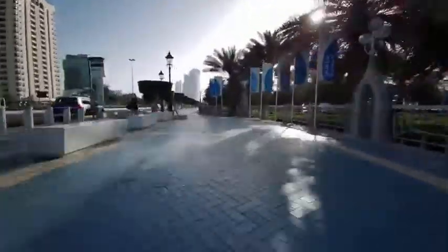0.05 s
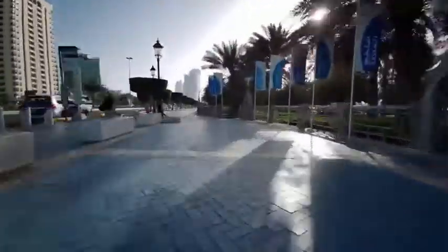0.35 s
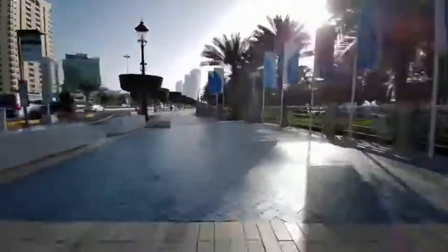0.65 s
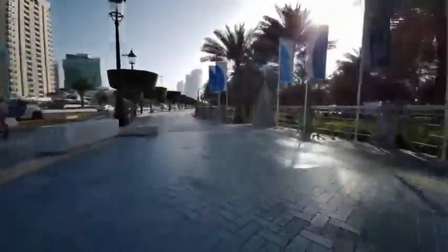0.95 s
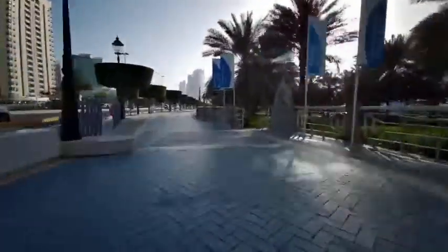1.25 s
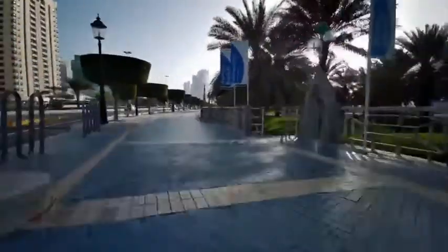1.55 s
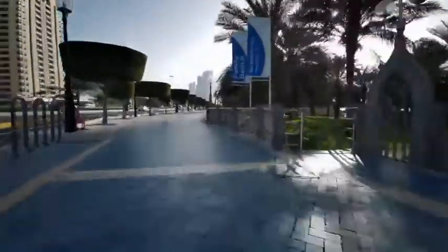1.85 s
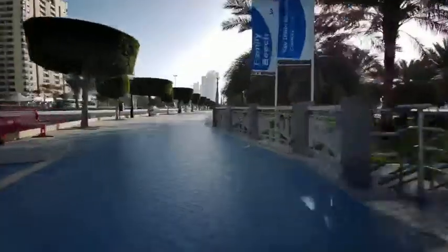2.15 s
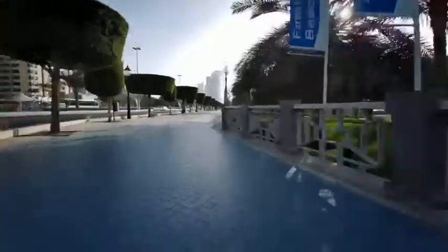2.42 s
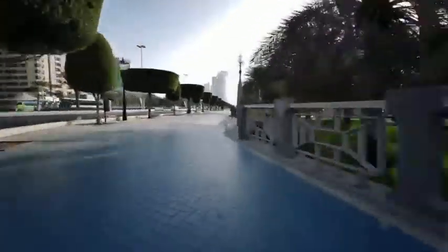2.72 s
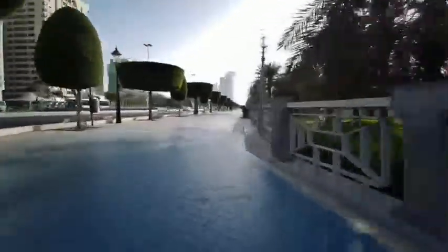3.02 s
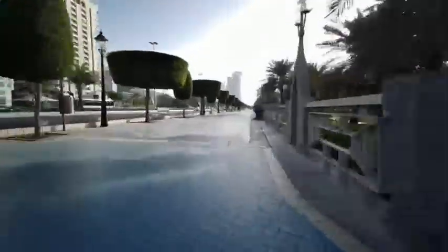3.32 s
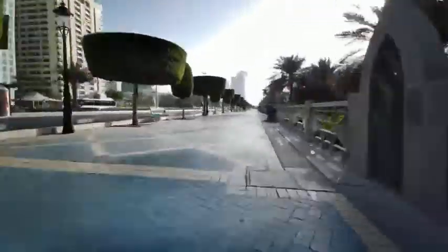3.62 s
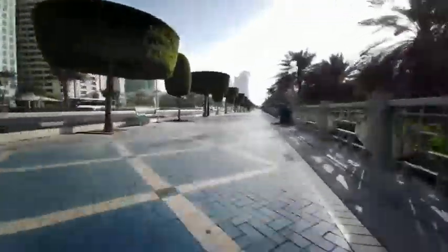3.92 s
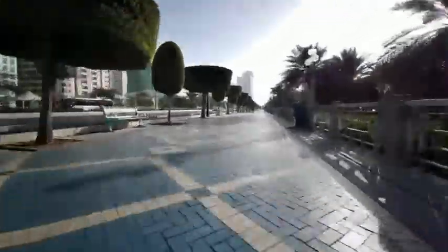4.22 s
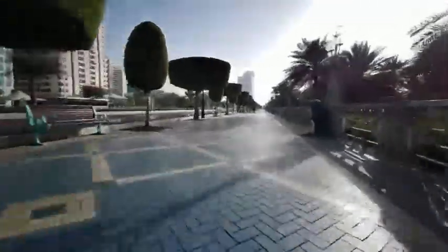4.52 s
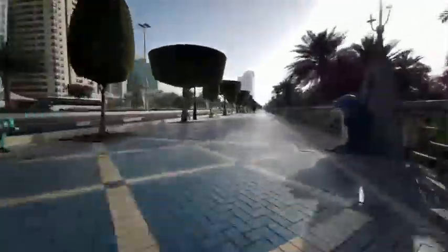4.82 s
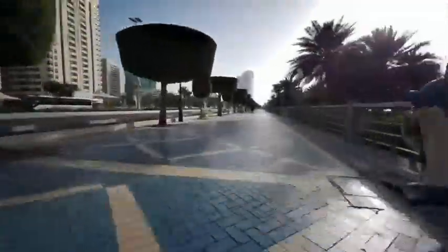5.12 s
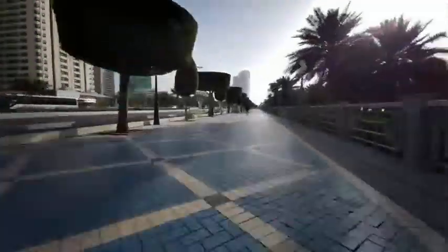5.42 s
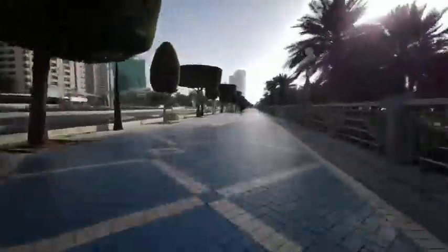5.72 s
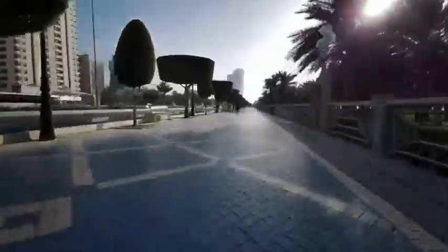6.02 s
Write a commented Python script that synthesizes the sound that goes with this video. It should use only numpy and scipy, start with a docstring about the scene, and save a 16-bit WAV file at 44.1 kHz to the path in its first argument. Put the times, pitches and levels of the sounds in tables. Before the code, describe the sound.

An electric mini bike rides over brick paving for about six seconds, heard up close from the rider. Throughout, the tyres make a hollow, drumming roar and the motor holds a slightly throbbing, mid-pitched whine that barely rises. Wind flaps and rumbles on the microphone, gusting near 0.3, 0.7, 1.6, 2.1 and 4.3 seconds, and is weaker towards the end. Loose parts clack right at the start, followed by a run of thuds from raised bricks until 0.4 seconds. More thuds and rattles come near 0.7, from 1.5 to 2.6, around 3, at 4.1, around 4.7 and from 5.3 to 5.9 seconds. Grit ticks lightly on metal here and there. From about 3 seconds a rubbing brake adds a faint, high, pulsing note, clearest near 3.4 and 5.3 seconds. The bike keeps its pace to the end.

```python
"""Electric mini bike on brick paving

A steady ride, heard up close from a stereo microphone in a case on the rider. The tyres drum on the
joints and ring the frame, the motor whines, and wind buffets the case. Bumps thud, loose parts clack,
grit ticks, and a lightly rubbing brake sings in the second half."""
import sys
import numpy as np
from scipy import signal
from scipy.fft import rfft, irfft
from scipy.io import wavfile

SR = 44100
rng = np.random.default_rng(int(sys.argv[2]) if len(sys.argv) > 2 else 0)


def dump_mix(stems):
    """Bounce the given channels to the path in sys.argv[1] as a 16-bit WAV at rate SR."""
    frames = np.atleast_2d(stems).T  # one column per channel
    limited = np.clip(frames, -1, 1)  # hard clip at full scale
    pcm = np.round(limited * 32767).astype(np.int16)
    wavfile.write(sys.argv[1], SR, pcm)


N = 271656
T = np.arange(N) / SR
HZ = np.fft.rfftfreq(N, 1 / SR)

# The motor's pace. Each row: time in seconds, pitch in Hz.
MOTOR_PITCH = [(0, 271.3), (.65, 271.5), (.9, 273.7), (1.4, 274.5), (1.7, 275), (2.2, 271), (2.55, 276.5),
               (3.3, 277), (3.7, 277.6), (4.1, 278.3), (4.5, 281.4), (5.5, 281.2), (6.16, 279.5)]
# Smoother and rougher paving. Each row: time in seconds, relative roar in dB, treble lift in dB.
PAVING_ROUGHNESS = [(0, -25, -1), (.5, -24.5, -3.5), (.85, -27.5, -.5), (1.25, -26.5, -2.5),
                    (1.52, -23.5, -2.5), (2.3, -25, -2.5), (2.75, -24.5, -1.5), (2.9, -23.5, -2.5),
                    (3.04, -22.5, -1), (3.3, -25.5, 0.5), (3.9, -25.5, 0.3), (4.3, -27.5, 0),
                    (5.15, -27, -0.5), (5.33, -26.5, 0.5), (5.46, -23.5, -0.5), (5.6, -24.5, 1),
                    (5.75, -26, 0), (6.16, -26.5, 0.5)]
# Roar and wind at the microphone. Each row: frequency in Hz, left-right likeness.
CASE_LIKENESS = [(25, 0.93), (60, 0.99), (150, 0.97), (330, 0.96), (550, 1), (1000, 0.97), (1550, 1),
                 (2600, 0.19)]


def gain_of(db):
    """Decibels to a factor."""
    return 10 ** (np.asarray(db) / 20)


def evened(x):
    """Scales to rms 1."""
    return x / np.sqrt(np.mean(x ** 2) + 1e-20)


def blip(x):
    """Scales a short stereo sound to the energy of one millisecond at rms 1."""
    return x / np.sqrt((x ** 2).mean(0).sum() * 1000 / SR)


def spectrum(points):
    """A spectrum table on the frequency grid."""
    hz, value = np.transpose(points)
    return np.interp(np.log(HZ + 1), np.log(hz + 1), value)


def follow(rows):
    """The columns of a curve table, sample by sample."""
    s, *columns = np.transpose(rows)
    return [np.interp(T, s, column) for column in columns]


def add(mix, s, sound):
    """Lays a stereo sound into the mix at time s."""
    part = mix[:, max(round(s * SR), 0):][:, :sound.shape[1]]
    part += sound[:, :part.shape[1]]


def swell(s, half_s):
    """A smooth rise from 0 to 1 and back, centred on time s."""
    return np.exp(-((T - s) / half_s) ** 2)


def wander(rate_hz):
    """A slow random drift of rms 1, up to about the given rate."""
    return evened(irfft(rfft(rng.standard_normal(N)) / (1 + (HZ / rate_hz) ** 4), N))


def sway(radians):
    """The swaying case shifts the phase between the left and right of the microphone."""
    return radians * wander(20) * np.array([[1], [-1]])


def stereo_noise(colour, likeness, drive=None):
    """Colours two unrelated drives, white noise unless given, into a left and right of that likeness."""
    if drive is None:
        drive = rng.standard_normal((2, N))
    mid, side = rfft(drive) * colour
    mid, side = mid * np.sqrt(1 + likeness), side * np.sqrt(1 - likeness)
    return evened(irfft(np.array([mid + side, mid - side]), N))


def causal(gain):
    """Gives a gain curve the phase of a body that rings after each blow, never before it."""
    log_gain = np.log(np.r_[gain, gain[-2:0:-1]])
    return np.exp(np.conj(signal.hilbert(log_gain)))[:len(gain)]


def peaks(modes):
    """The frequency response of a few steep resonances."""
    return sum(gain_of(db) / (1 + 2j * (HZ - hz) / width) / (1 + ((HZ - hz) / (2 * width)) ** 2)
               for hz, width, db in modes)


def wheel(per_turn=1, motor_cycles_per_turn=40, crest_s=0.125):
    """A swing that comes a given number of times in each turn of the wheel."""
    hz, = follow(MOTOR_PITCH)
    turns = np.cumsum(hz / motor_cycles_per_turn) / SR
    return np.cos(2 * np.pi * per_turn * (turns - np.interp(crest_s, T, turns)))


def hiss(level_db=-64, flicker_db=1.5):
    """Thin air and tread hiss that gets through the case."""
    # The hiss's colour. Each row: frequency in Hz, relative level in dB.
    colour = [(1200, -10.5), (2200, -0.5), (3400, 2.5), (4300, -5), (5800, -3.5), (6800, -10), (8200, -9.5),
              (9000, -9), (11300, -13.5), (12500, -25.5), (14500, -17), (15600, -26.5)]
    # Its stereo image. Each row: frequency in Hz, left-right likeness.
    likeness = [(2000, 0.045), (5000, 0.57), (6500, .2), (8500, -0.61), (11000, -.1), (14000, .2)]
    air = stereo_noise(gain_of(spectrum(colour)), spectrum(likeness))
    return air * gain_of(level_db + flicker_db * wander(28))


def whistles(level_db=-70):
    """The spinning drive keeps a few high resonances sounding, dead centre."""
    # The drive's resonances. Each row: frequency in Hz, width in Hz, relative level in dB.
    modes = [(2990, 200, -4), (3240, 160, -6.5), (4090, 50, -10.5), (4745, 55, -5), (4460, 46, -7),
             (5000, 150, -12.5), (6100, 80, -14), (7780, 70, -16.5), (8770, 170, -18)]
    return gain_of(level_db) * stereo_noise(peaks(modes), likeness=1)


def overtones(blur_hz=30, flutter_db=2.5):
    """Thin high tones that ride on the motor's pitch and waver with its vibration."""
    # The three tones, as multiples of the motor's pitch.
    multiples = [10.11, 10.93, 12.12]
    # Their strength. Each row: time in seconds, then the lowest, middle and highest tone in dB.
    levels = [(0, -83, -76, -78), (2.1, -83.5, -74, -78), (2.5, -81, -77.5, -70),
              (3.2, -80.5, -78.5, -72.5), (4.2, -72.5, -79, -79), (4.55, -69.5, -75, -77.5),
              (5.2, -72, -78, -75.5), (5.8, -70, -78.5, -73), (6.16, -69, -77.5, -72)]
    hz, = follow(MOTOR_PITCH)
    out = np.zeros((2, N))
    for multiple, level_db in zip(multiples, follow(levels)):
        angle = 2 * np.pi * np.cumsum(multiple * hz + blur_hz * wander(30)) / SR
        tone = np.sin(angle + sway(0.27)) * gain_of(flutter_db * wander(25))
        out += gain_of(level_db) * evened(tone)
    return out


def brake(disc_hz=3035, waver_hz=29, throb_db=4.5, flutter_db=2, chirp_db=-1.5, scrape_db=-4):
    """The pad brushes the disc four times a turn; each touch is a wavering chirp over a soft scrape."""
    # The pad's rub. Each row: time in seconds, relative level in dB.
    rub = [(0, -79), (2.85, -75.5), (3.02, -63.5), (3.22, -61.5), (3.3, -57), (3.39, -56), (3.46, -63.5),
           (3.8, -62), (4.1, -62), (4.4, -69), (4.7, -68), (4.94, -59.5), (5.119, -67), (5.28, -56),
           (5.36, -64), (5.6, -63.5), (5.75, -68), (6.16, -71)]
    # The disc's resonances. Each row: frequency in Hz, width in Hz, relative level in dB.
    disc_modes = [(3040, 100, -0.5), (2940, 130, -5.5), (3330, 98, -15)]
    rub_db, = follow(rub)
    angle = 2 * np.pi * np.cumsum(disc_hz + waver_hz * wander(35)) / SR
    note = np.sin(angle + sway(0.55))
    chirps = evened(note * gain_of(throb_db * wheel(per_turn=4) + flutter_db * wander(30)))
    scrape = stereo_noise(peaks(disc_modes), likeness=0.47)
    return gain_of(rub_db) * (gain_of(chirp_db) * chirps + gain_of(scrape_db) * scrape)


def grit(ring_hz=3845, rise_s=0.0005, ring_decay_s=0.0015, snap_decay_s=0.0008, snap_trim_db=0.8):
    """Each stone gives a bright snap and one short metallic note; many faint ones fall between."""
    # Stones on the metalwork. Each row: start in seconds, relative levels of ring and snap in dB.
    stones = [(0.4504, -45.5, -58), (0.689, -55, -59.5), (0.7925, -52, -55.0), (0.8844, -47, -48),
              (1.3912, -41.5, -49.5), (1.467, -63, -61.0), (1.6555, -49, -45), (1.675, -54.0, -62),
              (1.729, -56.5, -56), (1.9715, -40.0, -53), (2.668, -52, -68), (2.7347, -46.5, -57),
              (2.8598, -52.5, -54.5), (3.032, -49, -58), (3.146, -50.0, -63.5), (3.2505, -60, -56.0),
              (3.342, -62, -57), (3.4273, -46, -55), (3.5139, -53, -58), (3.5813, -55, -56),
              (3.661, -58.0, -59), (3.815, -68, -61.5), (3.983, -56.0, -59), (4.034, -54, -65.5),
              (4.2933, -50.0, -53), (4.429, -49.5, -61.5), (4.719, -56.5, -57.0), (5.0036, -42.5, -46),
              (5.0629, -60, -54), (5.1514, -53, -58), (5.222, -57, -66.0), (5.3043, -48.5, -59),
              (5.612, -53.0, -52), (5.7674, -55, -57), (5.882, -49, -56), (6.0114, -50.5, -55),
              (6.133, -55, -56.0)]
    # The snap's colour. Each row: frequency in Hz, relative level in dB.
    snap_colour = [(2000, -10.5), (3300, 0), (4600, 3), (6200, -0.5), (7600, -6), (8700, -3.5),
                   (9400, -8.5), (10000, -2.5), (12000, -16), (13300, -14.5), (14100, -7), (15500, -14)]
    out, t = np.zeros((2, N)), np.arange(1024) / SR
    hz = np.fft.rfftfreq(len(t), 1 / SR)
    colour = causal(gain_of(np.interp(hz, HZ, spectrum(snap_colour))))
    envelope = (1 - np.exp(-t / rise_s)) ** 2 * np.exp(-t / ring_decay_s)
    faint = rng.uniform([0, -66, -66], [N / SR, -60, -60], (70, 3))  # same columns as stones
    for s, ring_db, snap_db in [*stones, *faint]:
        phase = 2 * np.pi * rng.random() + 0.5 * rng.standard_normal((2, 1))
        note_hz = ring_hz * (1 + 0.008 * rng.standard_normal())
        ring = envelope * np.sin(2 * np.pi * note_hz * t + phase)
        burst = rng.standard_normal((2, len(t))) * np.exp(-t / snap_decay_s)
        snap = irfft(rfft(burst) * colour)
        add(out, s, gain_of(ring_db) * blip(ring) + gain_of(snap_db + snap_trim_db) * blip(snap))
    return out


def clacks(chatter_db=-44.5, chatter_decay_s=0.0029, chatter_count=130, usual_roar_db=-27.5, width=0.21):
    """Loose parts knock, brighter for harder contacts, over a soft chatter that rough paving lifts."""
    # The knocks. Each row: start in seconds, peak in dB, hardness in dB per octave, decay in seconds.
    knocks = [(0.0318, -13, -7, 0.0013), (0.0368, -23.5, -6, 0.005), (.053, -24, -6, 0.0029),
              (.064, -21, -15.5, .004), (.088, -25, -13, .004), (0.108, -36, 2.5, 0.0021),
              (.132, -31.5, 1, .002), (0.622, -31, -1.5, .002), (0.64, -30, -5.5, 0.0018),
              (0.996, -26.5, -5.5, .003), (1.174, -28.5, -4.5, 0.0038), (1.501, -24.5, -8, 0.0069),
              (1.509, -28, -8, 0.0046), (1.53, -27, -1.5, 0.0022), (1.599, -36, 5.5, 0.0034),
              (1.729, -30, 1, 0.001), (1.807, -29, -3, 0.0017), (1.815, -19.5, -4, 0.0025),
              (1.828, -29, -1, 0.0016), (1.934, -41, 2, .0015), (2.116, -29, 0, .002),
              (2.125, -35.5, 1.5, .002), (2.263, -38, 0, .002), (2.323, -33.5, -1, .002),
              (2.366, -41, -1, 0.0014), (2.433, -31.5, -2, .0015), (2.506, -32, -1, .004),
              (2.532, -30.5, -5, 0.0037), (2.578, -28, -11, 0.0041), (2.982, -34, -1, 0.0032),
              (4.595, -36, -2, .002), (4.805, -27, -6, 0.0022), (5.42, -25, -10, 0.0031),
              (5.437, -39.5, 3.5, 0.0041), (5.454, -31, -0.5, 0.0014), (5.474, -32, -1.5, 0.0018),
              (5.535, -30.5, -1, .0018), (5.556, -27, -5.5, .004), (5.977, -43, 3, .0015)]
    # The parts' colour. Each row: frequency in Hz, relative level in dB.
    body = [(400, -22), (900, 2.5), (1350, 12.5), (1850, -1), (2500, -9), (3000, -20.5), (3900, -14),
            (4700, -20), (5500, -14), (6300, -33.5), (9000, -40), (15000, -56.5)]
    out, t = np.zeros((2, N)), np.arange(1024) / SR
    hz = np.fft.rfftfreq(len(t), 1 / SR)
    body_db = np.interp(hz, HZ, spectrum(body))
    octaves = np.log2(np.maximum(hz, body[0][0]))
    roar_db, _ = follow(PAVING_ROUGHNESS)
    shaken_db = chatter_db + 0.8 * (roar_db - usual_roar_db)
    chatter = [(T[i], shaken_db[i], rng.normal(-1.7, 1.7), chatter_decay_s)
               for i in rng.integers(0, N, chatter_count)]
    for s, peak_db, hardness, decay_s in knocks + chatter:
        mid, side = rng.standard_normal((2, len(t))) * np.exp(-t / decay_s)
        mid[0] += 2.5  # the crack of first contact
        burst = np.array([mid + width * side, mid - width * side])
        knock = irfft(rfft(burst) * causal(gain_of(body_db + hardness * octaves)))
        add(out, s, gain_of(peak_db) * knock / abs(knock).max())
    return out


def bumps(rise_s=0.0016, trim_db=2.5):
    """Each raised brick gives a thud of a few cycles, with a lower and a higher partner."""
    # Wheels hitting raised bricks. Each row: time in seconds, relative peak in dB, main ring in Hz.
    hits = [(.187, -16.5, 350), (.197, -14, 792), (.204, -13, 635), (.265, -19.5, 610), (.277, -19, 497),
            (.283, -29, 440), (.295, -14.5, 482), (.301, -20, 517), (.402, -15.5, 385), (.404, -18, 830),
            (.418, -22, 715), (0.681, -15.5, 547), (.714, -22, 695), (1.492, -21.5, 530), (1.502, -15, 615),
            (1.510, -17.5, 680), (1.531, -14.5, 655), (1.808, -21, 637), (1.944, -13.5, 602),
            (2.017, -17, 502), (2.06, -17.5, 550), (2.756, -24, 720), (2.959, -22, 637), (2.977, -18, 595),
            (3.058, -23, 640), (3.079, -22, 687), (4.117, -16, 565), (4.185, -18.5, 550), (4.234, -22, 623),
            (4.665, -17.5, 670), (4.729, -22, 567), (4.836, -24, 649.3), (4.868, -23, 700),
            (5.27, -19.5, 570), (5.4196, -16, 613.2), (5.479, -22, 596), (5.558, -22.5, 680),
            (5.633, -18.5, 687), (5.886, -18.5, 537), (5.899, -16.5, 665)]
    out, t = np.zeros((2, N)), np.arange(2200) / SR
    for s, db, hz in hits:
        thud = sum(gain * np.sin(2 * np.pi * hz * ratio * t + rng.uniform(-1.1, 1))
                   for ratio, gain in [(0.55, 0.24), (1, 0.91), (1.4, 0.31)])
        thud *= (t / rise_s) ** 2 * np.exp(-t / rise_s)
        thud *= gain_of(db + trim_db) / abs(thud).max()
        add(out, s - rise_s, np.tile(thud, (2, 1)))
    return out


def wind(lumps_db=1.66, trim_db=-2):
    """Air flaps in lumps right on the case, with a deep rumble under it; gusts shift both levels."""
    # The steady wind. Each row: time in seconds, relative levels of flapping and rumble in dB.
    breeze = [(0, -32, -44.5), (.35, -26, -45), (.7, -29, -40), (1.1, -33.5, -46.5), (1.5, -32.5, -45),
              (2.25, -33, -51), (2.7, -29.5, -50.5), (3.2, -31.5, -48), (4.3, -36, -49.5),
              (4.75, -39, -56.5), (5.45, -36.5, -52), (6.16, -39, -59)]
    # Gusts. Each row: centre and half length in seconds, changes of flapping and rumble in dB.
    gusts = [(0.092, 0.023, 7, -6), (0.193, 0.024, 6.5, -6), (0.279, 0.039, 9.5, 2.5),
             (0.397, 0.038, 0, -4.5), (0.685, 0.044, 9, 5), (0.735, 0.013, -5.5, 10),
             (1.64, 0.043, 9.5, 1.5), (1.958, 0.031, 0, -5.5), (2.125, 0.022, 6.5, 9.5),
             (2.988, 0.015, 5.5, -4), (4.301, 0.026, 7.5, 9)]
    # The colours of flapping and rumble. Each row: frequency in Hz, relative level in dB.
    flap = [(60, -32.5), (110, -7.5), (170, -1.5), (250, -0.5), (340, -0.5), (450, 0), (700, -25),
            (1500, -51), (3000, -82.5)]
    rumble = [(12, -33.5), (25, -21.5), (45, -8.5), (70, -2), (115, 2.5), (160, -9), (300, -32.5),
              (1500, -75.5)]
    gusts_db = sum(np.outer(changes_db, swell(s, half_s)) for s, half_s, *changes_db in gusts)
    out = np.zeros((2, N))
    for colour, level_db in zip((flap, rumble), np.array(follow(breeze)) + gusts_db):
        air = stereo_noise(gain_of(spectrum(colour)), spectrum(CASE_LIKENESS))
        out += air * gain_of(level_db + trim_db + lumps_db * wander(17))
    return out


def motor(shake_cycles_per_db=0.014, throb_db=2.5, fourth_db=-19):
    """A hum and a whine that throbs with each wheel turn, shaken in phase and level by the paving."""
    # The motor's voice. Each row: time in seconds, then hum, whine and depth of shaking in dB.
    levels = [(0, -40, -34, 0), (.26, -43.5, -27, 2.5), (.35, -35.5, -30, 3), (.76, -51, -39, 5.5),
              (.85, -58, -31.5, 4.5), (1.1, -43, -34.5, 6), (1.3, -42, -31, 4.5), (1.42, -40, -27, 0),
              (1.6, -53, -39, 5.5), (1.75, -46.5, -40, 2), (2.4, -45, -41.5, 3.5), (2.6, -46, -32.5, 2),
              (3.3, -42, -35, 2.5), (3.65, -37, -31.5, 2.5), (3.95, -41, -37.5, 0.5),
              (4.62, -57.5, -36.5, 5.5), (4.78, -36.5, -35, 2.5), (5.6, -41, -36, 3), (6.16, -37.5, -38, 3)]
    hz, = follow(MOTOR_PITCH)
    hum_db, whine_db, shake_db = follow(levels)
    angle = 2 * np.pi * (np.cumsum(hz) / SR + shake_cycles_per_db * shake_db * wander(14))
    lead = sway(0.11)
    harmonics = [(1, hum_db, 0), (2, whine_db, throb_db), (4, whine_db + fourth_db, throb_db)]
    out = np.zeros((2, N))
    for multiple, level_db, depth_db in harmonics:
        tremble = gain_of(depth_db * wheel() + shake_db * wander(31))
        out += gain_of(level_db) * evened(np.sin(multiple * angle + lead) * tremble)
    return out


def tread():
    """The regular tread blocks give the roar a fuzzy note on the finer bricks."""
    # Patches of finer bricks. Each row: centre and half length in seconds, level in dB.
    patches = [(3.905, 0.69, -40), (5.438, 0.18, -32), (5.986, 0.5, -39.5)]
    # The tread's note. One row: frequency in Hz, width in Hz, relative level in dB.
    note = [(763, 39, 0)]
    singing = sum(gain_of(db) * swell(s, half_s) for s, half_s, db in patches)
    return singing * stereo_noise(peaks(note), likeness=1)


def tyres(joints_per_s=170, joint_share=0.16, flutter_db=0.5, turn_db=-0.21, treble_hz=950, trim_db=-1.5):
    """Brick joints and tread noise ring the frame below the rider; the roar follows the tyres' load."""
    # The roar's colour. Each row: frequency in Hz, relative level in dB.
    roar_colour = [(60, -40.5), (150, -24), (260, -8), (400, -9.5), (600, -0.5), (800, -4.5), (940, -12.5),
                   (1150, -10.5), (1480, -18.5), (1800, -30), (2200, -37), (2700, -49.5), (4000, -52.5),
                   (8000, -83)]
    # Ringing of frame and case. Each row: frequency in Hz, width in Hz, dB over the roar.
    frame_modes = [(498.7, 45, 7), (545, 38, -1.5), (690, 28, -12), (762, 9.7, 1.5), (900, 17, -7),
                   (1040, 49, -2.5)]
    # Tyres pressing or going light. Each row: centre and half length in seconds, roar change in dB.
    jolts = [(0.185, 0.0069, -0.5), (0.302, 0.014, 4.5), (0.317, 0.033, -4.5), (0.415, 0.03, 4.5),
             (0.714, 0.024, 2), (1.107, 0.011, -7.5), (3.271, 0.006, 2.5), (4.644, 0.017, -4.5),
             (4.817, 0.011, -6), (5.437, 0.012, 2.5), (5.873, 0.029, 2)]
    roar_db, lift_db = follow(PAVING_ROUGHNESS)
    jolts_db = sum(db * swell(s, half_s) for s, half_s, db in jolts)
    load_db = jolts_db + turn_db * wheel() + flutter_db * wander(6.4)
    joints = evened((rng.random(N) < joints_per_s / SR) * rng.choice([-1, 1], N))
    drive = rng.standard_normal((2, N))
    drive[0] = np.sqrt(1 - joint_share) * drive[0] + np.sqrt(joint_share) * joints  # joints sit centre
    ring_power = sum(gain_of(db) ** 2 / (1 + (2 * (HZ - hz) / width) ** 2)
                     for hz, width, db in frame_modes)
    body = gain_of(spectrum(roar_colour)) * np.sqrt(1 + ring_power)
    roar = stereo_noise(causal(body), spectrum(CASE_LIKENESS), drive)
    treble = irfft(rfft(roar) * (1 - 1 / (1 + (HZ / treble_hz) ** 8)), N)
    return (roar + treble * (gain_of(lift_db) - 1)) * gain_of(trim_db + roar_db + load_db)


def scene():
    """Every source rides along with the microphone, so its distance never changes."""
    rolling = tyres() + tread() + wind() + motor() + overtones() + whistles() + brake() + hiss()
    return rolling + bumps() + clacks() + grit()


def record(dry):
    """The case shades the microphone's two sides differently, and the highest treble is cut off."""
    # The case's shading. Each row: frequency in Hz, left minus right in dB.
    shading = [(100, 0.5), (200, 0), (600, -0.5), (1100, -0.5), (2000, -7.5), (3000, 3.5), (8000, 1.5),
               (14000, 1)]
    shaded = irfft(rfft(dry) * gain_of(np.array([[0.5], [-0.5]]) * spectrum(shading)), N)
    lowpass = signal.firwin(511, cutoff=15700, window=("kaiser", 9), fs=SR)
    return signal.oaconvolve(shaded, lowpass[None], "same")


dry = scene()
out = record(dry)
dump_mix(out)
```